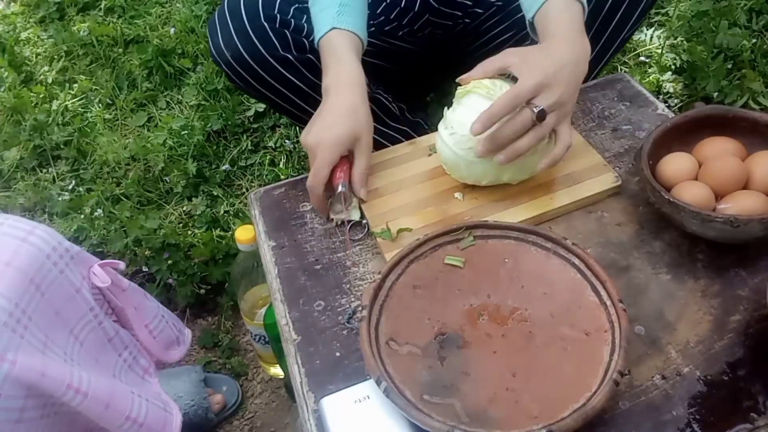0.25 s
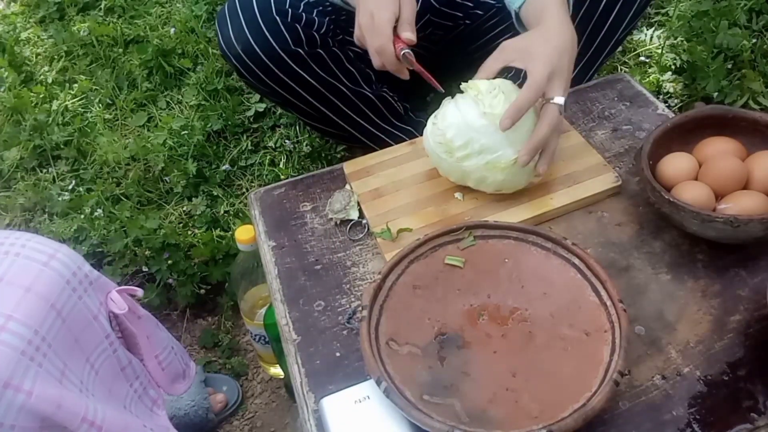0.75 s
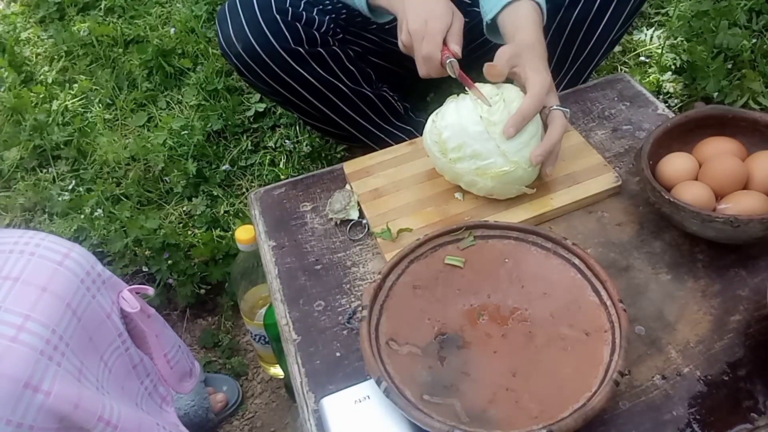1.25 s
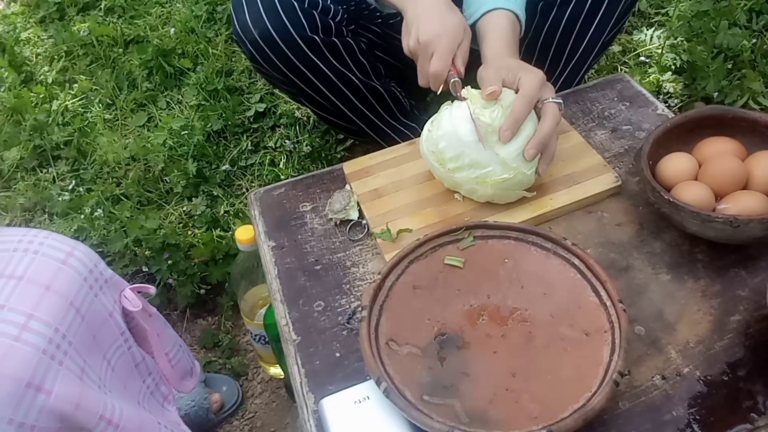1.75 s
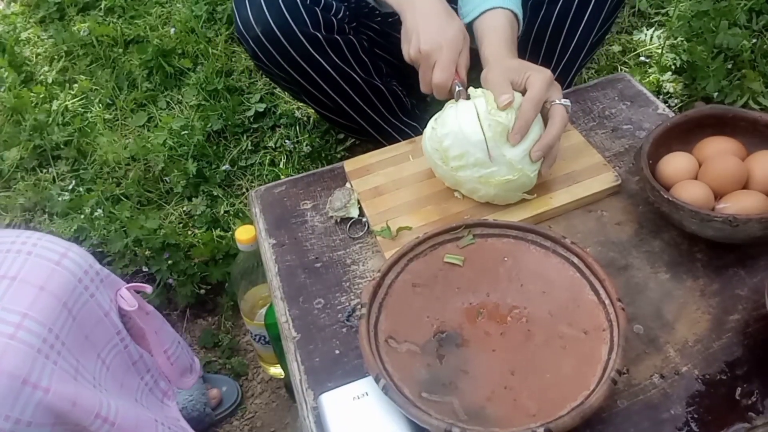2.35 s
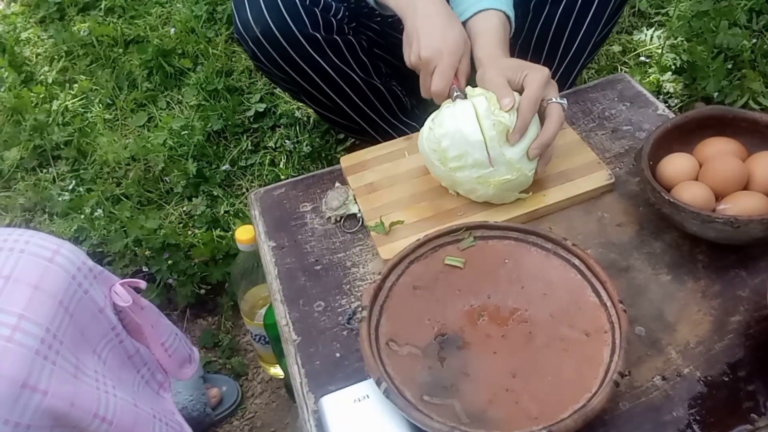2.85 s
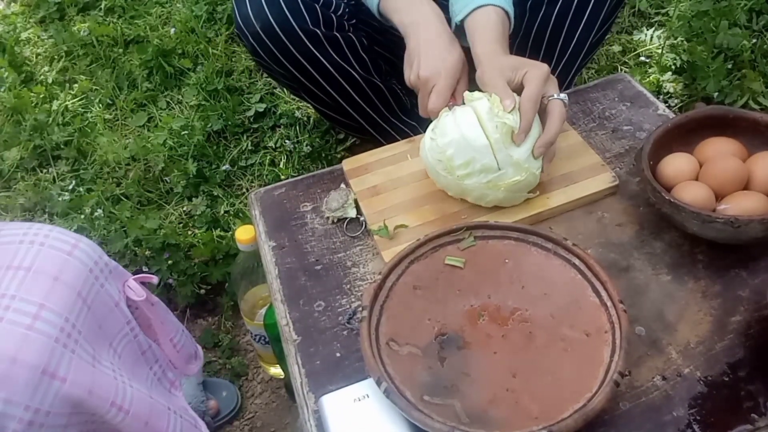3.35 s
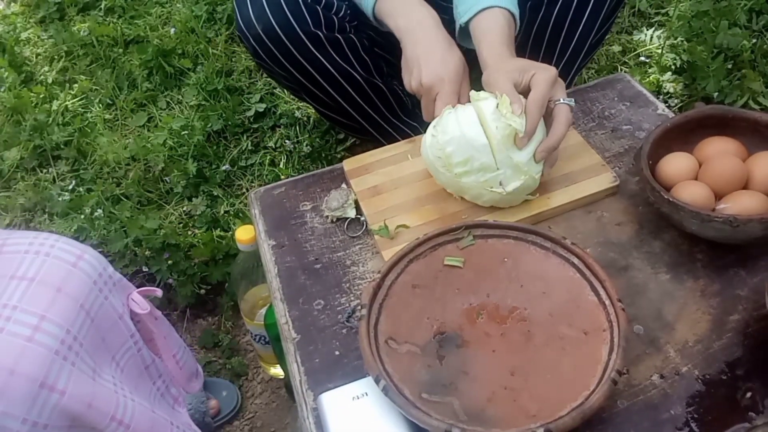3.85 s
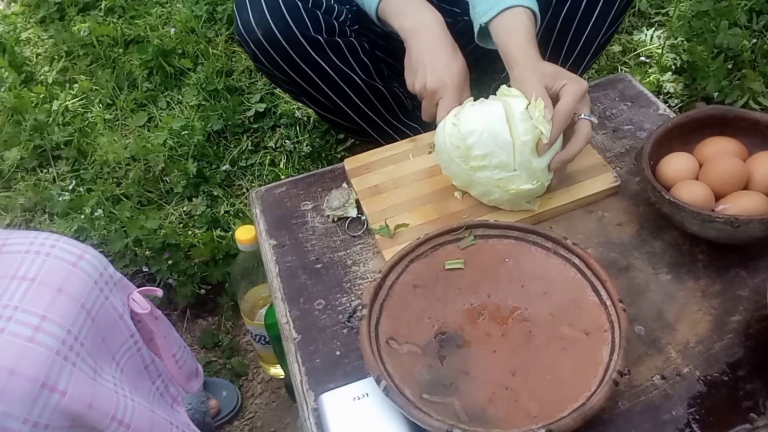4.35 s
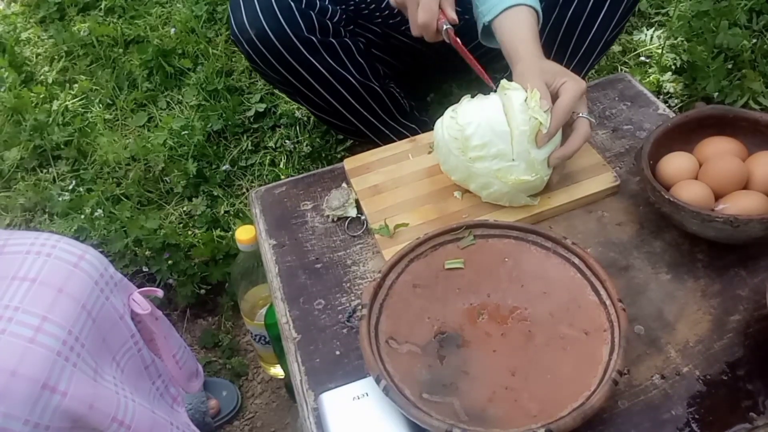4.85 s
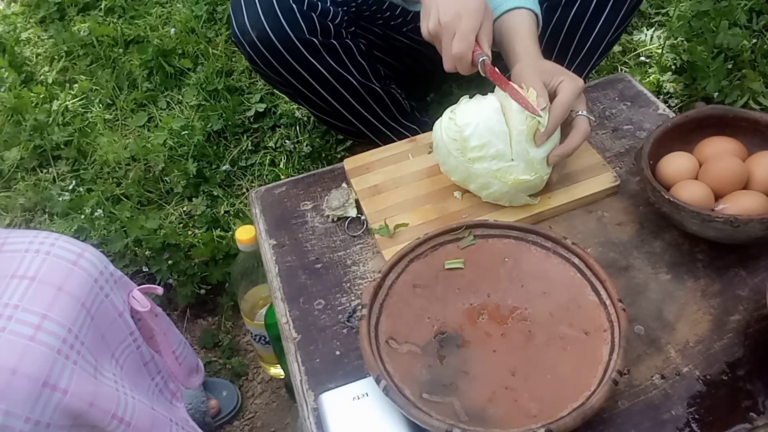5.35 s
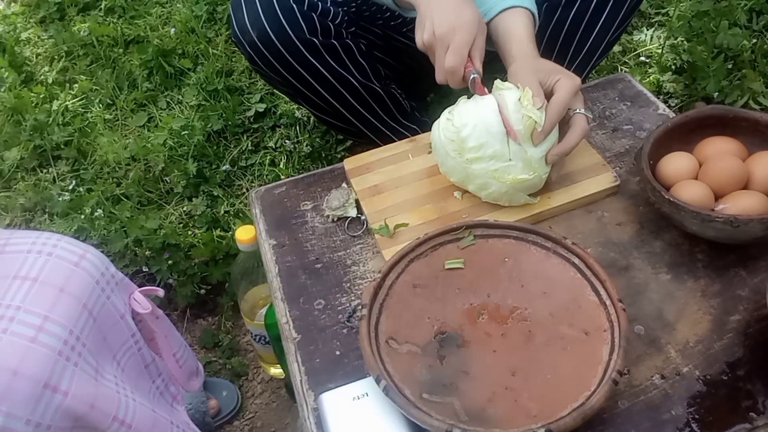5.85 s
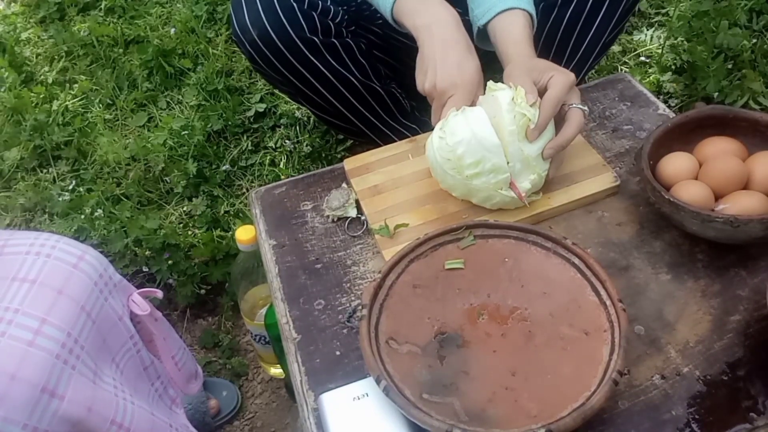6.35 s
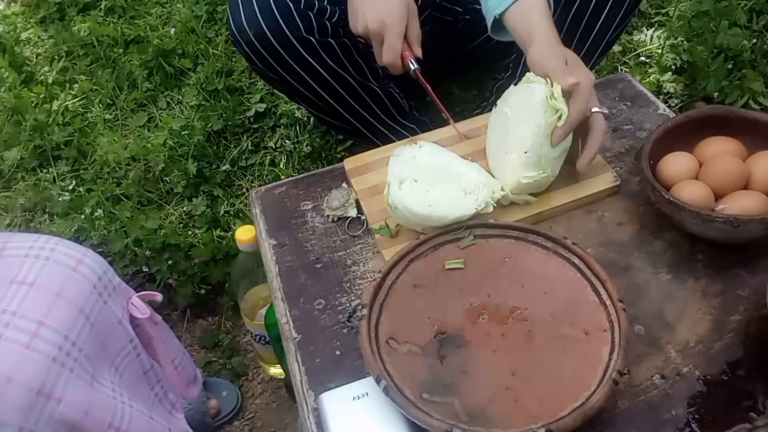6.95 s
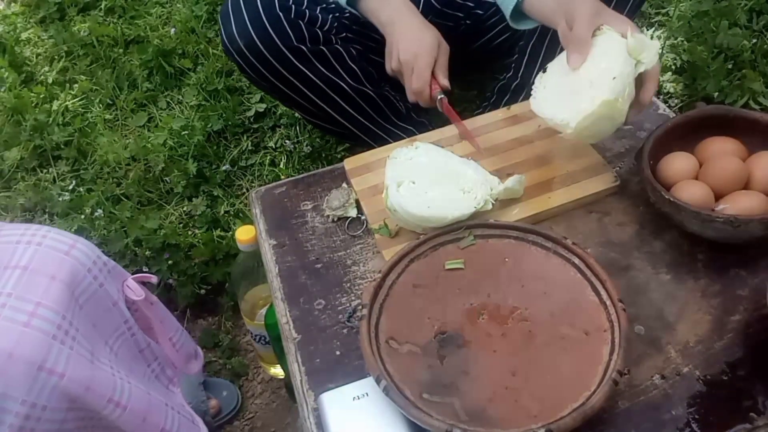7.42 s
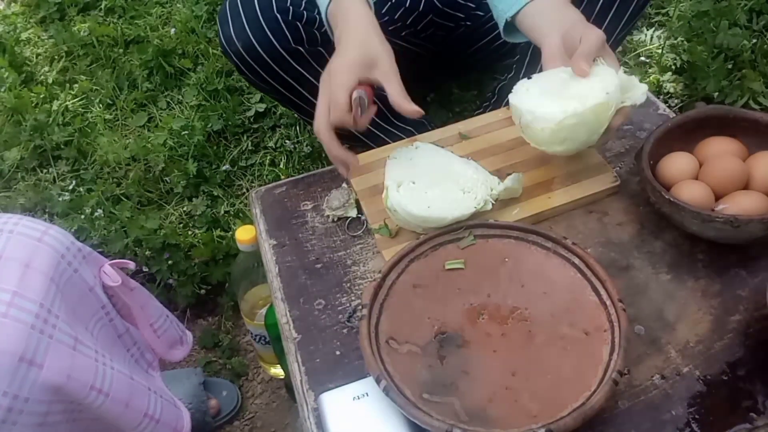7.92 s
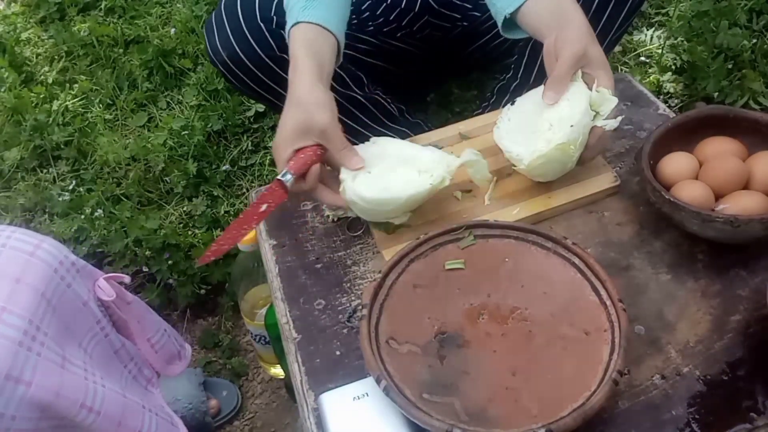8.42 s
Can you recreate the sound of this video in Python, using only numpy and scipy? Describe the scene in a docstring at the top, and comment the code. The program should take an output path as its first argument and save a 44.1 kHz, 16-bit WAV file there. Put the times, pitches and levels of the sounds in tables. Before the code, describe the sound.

Close, dry outdoor cabbage cutting: leafy rustles, a sharp clack, rhythmic crunching saw strokes with cracks, a splitting crack, and hollow wooden knocks.

```python
"""Hands rustle over leaves and a soft low rumble lies underneath; then a knife clacks on a table outdoors.
Close to the microphone it saws through a raw cabbage on a wooden board.
Leaves tear in bursts of tiny random fractures, ribs and core crack, and slips make the wet blade squeak.
Hollow pockets pop with sagging notes; the head splits and its halves knock, ringing the modes of the board."""
import sys
import numpy as np
from scipy import signal
from scipy.fft import rfft, irfft
from scipy.io import wavfile
from scipy.ndimage import uniform_filter1d

SR = 44100
rng = np.random.default_rng(int(sys.argv[2]) if len(sys.argv) > 2 else 0)


def dump_mix(stems):
    """Bounce the given channels to the path in sys.argv[1] as a 16-bit WAV at rate SR."""
    frames = np.atleast_2d(stems).T  # one column per channel
    limited = np.clip(frames, -1, 1)  # hard clip at full scale
    pcm = np.round(limited * 32767).astype(np.int16)
    wavfile.write(sys.argv[1], SR, pcm)


N = 382788

# pushes and pulls of the sawing blade, levels before the trim in strokes(): start t/s, length t/s,
# level/dB, growth level/dB, hollow body at start level/dB, at end level/dB, juicy fizz level/dB
SAW_STROKES = [(1.695, .007, -37, 2, 7, 8, 6), (1.73, 0.13, -44.5, 4, -1, 1, 4.5),
               (1.958, 0.067, -44.5, -18, -13, -3, 6.5), (2.109, 0.09, -47.5, -4, 3.5, -1, 4.5),
               (2.271, 0.053, -50.5, 2, -14, 2, 5), (2.438, 0.087, -45, -4, -3.5, 2.5, 5.5),
               (2.599, .1, -46.5, -1, -21, -4.5, 7), (2.775, 0.078, -47.5, -12, -4.5, 3.5, 6.5),
               (2.943, 0.062, -39.5, 14, -9, 7, 2.5), (3.149, 0.051, -52.5, 0, -10, -7, 9.5),
               (3.3, 0.12, -53, -8, 7, 0, -2), (3.529, 0.13, -44.5, -11.5, 1.5, 7, 2),
               (3.746, .11, -54.5, -0.5, -10, 6.5, 4.5), (3.951, 0.094, -42.5, 0, 3.5, 5.5, 5.5),
               (4.09, 0.022, -48.5, -7, 7, 5, -9), (4.194, 0.072, -43, 6, -1, 4.5, 2),
               (4.307, 0.13, -32.5, 6, 5, -5.5, -4.5), (4.526, 0.072, -39, 0.5, 0, -10, 4),
               (4.688, 0.068, -43.5, 1.5, -4, -8.5, 3), (4.818, 0.15, -51, 2, 0.5, -7.5, -27)]
BITE_S = 0.004  # how fast the edge takes hold


def gain_of(db):
    """Decibels to amplitude gain."""
    return 10 ** (np.asarray(db) / 20)


def evened(x):
    """Scales to rms 1."""
    return x / np.sqrt(np.mean(x ** 2) + 1e-20)


def read(points, hz):
    """Joins (f/Hz, value) points on a log-frequency axis."""
    f, value = np.transpose(points)
    return np.interp(np.log(hz + 1), np.log(f + 1), value)


def add(mix, s, sound):
    """Lays a sound into the mix at time s, cut at the mix's end."""
    part = mix[max(round(s * SR), 0):][:len(sound)]
    part += sound[:len(part)]


def click(*spectra, size=2048):
    """The sharpest causal (minimum-phase) pulse that has the product of these spectra."""
    hz = abs(np.fft.fftfreq(size, 1 / SR))
    log_gain = np.log(gain_of(sum(read(points, hz) for points in spectra)))
    log_spectrum = np.conj(signal.hilbert(log_gain))
    return np.fft.ifft(np.exp(log_spectrum)).real[:size // 2]


def ring(modes, size=16384):
    """Dying cosines, each scaled to a resonance peak of its own level."""
    t = np.arange(size) / SR
    out = np.zeros(size)
    for hz, db, t60 in modes:
        fade = gain_of(-60 * t / t60)
        out += 2 * gain_of(db) * fade / fade.sum() * np.cos(2 * np.pi * hz * t)
    return out


def scatter(x, wet_db, knee, fall, size=16384):
    """Nearby things throw back dense coloured echoes that thin out as a power of time."""
    t = np.arange(size) / SR
    onset = 1 - np.exp(-(t / 0.0025) ** 2)
    taps = rng.standard_normal(size) * onset * (1 + t / knee) ** -fall
    colour = [(150, 7.5), (500, 0.5), (1100, -8.0), (2200, -0.5), (4000, -8.5), (9000, -1), (15000, -3.0)]
    late = signal.fftconvolve(taps, click(colour))[:size]
    echoes = gain_of(wet_db) * late / np.linalg.norm(taps)
    echoes[0] += 1  # direct sound
    return signal.fftconvolve(x, echoes)


def fractures(count, per_s, spread_db):
    """Cell walls bursting at random: many small, a few large."""
    chance, size, sign = rng.random((3, count))
    burst = gain_of(spread_db * np.minimum(-np.log(1 - size), 4))
    return (chance < per_s / SR) * burst * np.sign(sign - .5)


def leaf(body_db, fizz_db):
    """One fracture: deep in the head it is hollow, at the surface it fizzes."""
    # colour of breaking leaf before the depth is added: f/Hz, level/dB
    crunch_colour = [(60, -37), (170, -5.5), (360, -2), (680, 3.5), (1400, -0.5), (1680, -3.5), (2050, -2),
                     (3200, -4.5), (4500, -14), (6000, -23.5), (8600, -31), (10500, -46.5), (15500, -51.5)]
    depth = [(600, body_db), (1500, 0), (3200, 0.0048), (8000, fizz_db), (14000, 2.3 * fizz_db)]
    return click(crunch_colour, depth) / np.linalg.norm(click(crunch_colour))


def shifting(x, patchy_db, width_hz, hold, size=1024):
    """The colour drifts at random, in patches width_hz wide that last about hold seconds."""
    hop = size // 4
    z = signal.stft(x, SR, nperseg=size, noverlap=size * 3 // 4)[2]
    patches = rng.standard_normal(z.shape)
    spans = [width_hz * size / SR, hold * SR / hop]  # in bins, in frames
    for axis, span in enumerate(spans):
        bell = np.exp(-(np.arange(-40, 41) / (span / 2)) ** 2)
        patches = signal.fftconvolve(patches, np.expand_dims(bell, 1 - axis), "same", axes=axis)
    gains = evened(gain_of(patchy_db * np.clip(evened(patches), -2, 2)))
    return signal.istft(z * gains, SR, nperseg=size, noverlap=size * 3 // 4)[1][:len(x)]


def pocket(x, depth, size=320):
    """Gaps between leaves return three echoes within milliseconds, at delays drawn for each call."""
    delays, signs = rng.random((2, 3))
    taps = np.zeros(size)
    places = (size * (.1 + .9 * delays)).astype(int)
    taps[places] = depth * np.sign(signs - .5)
    taps[0] = 1
    return signal.fftconvolve(x, taps / np.linalg.norm(taps))


def gesture(length, rise, fall):
    """A force that sets in exponentially, holds until length, and dies away exponentially."""
    t = np.arange(int((length + 5 * fall) * SR)) / SR
    return (1 - np.exp(-t / rise)) * np.exp(-np.maximum(t - length, 0) / fall)


def stepping(count, per_s, spread_db):
    """A gain that jumps to a new random value, on average per_s times a second."""
    step = np.cumsum(rng.random(count) < per_s / SR)
    return gain_of(spread_db * np.clip(rng.standard_normal(count), -2, 2))[step]


def air():
    """Outdoor rumble under a faint hiss: noise bands that drift in colour and swell a little together."""
    # relative colour of the outdoor air: f/Hz, level/dB
    air_colour = [(20, -34.5), (35, -22), (60, 0.5), (110, 3), (170, -1), (260, -17.5), (420, -27.5),
                  (800, -50.5), (1500, -32), (3200, -24.5), (6000, -39), (8600, -39.5), (10500, -49),
                  (15500, -52)]
    level_db, split_hz = -59, 199.5  # mean level; crossover from rumble to hiss
    hz = np.fft.rfftfreq(N, 1 / SR)
    spectrum = rfft(rng.standard_normal(N)) * gain_of(read(air_colour, hz))
    low = 1 / (1 + (hz / split_hz) ** 4)
    rumble = shifting(irfft(spectrum * low, N), patchy_db=3.0, width_hz=70, hold=0.11)
    hiss = shifting(irfft(spectrum * (1 - low), N), patchy_db=4.0, width_hz=190, hold=.14)
    t = np.arange(N) / SR
    swell = np.zeros(N)
    for rate in np.geomspace(.4, 9, 12):  # Hz
        swell += np.sin(2 * np.pi * (rate * t + rng.random())) / np.sqrt(rate)
    return evened(rumble + hiss) * gain_of(level_db + .5 * evened(swell))


def contact():
    """Strength of rustle, shuffle and crackle: powers of the dragging blade and moving hands add up."""
    # flat of the blade dragging inside the head, before the trims below:
    # t/s, rustle level/dB, dull shuffle of the head on the board level/dB
    drag_levels = [(1.7, -61, -86), (1.87, -55.5, -59.5), (2.18, -58, -65), (2.54, -56, -65.5),
                   (3.07, -59.5, -69), (3.52, -56, -67), (3.63, -55.5, -60), (3.96, -58, -63),
                   (4.12, -55.5, -55), (4.43, -48.5, -45.5), (4.83, -53, -68), (5.05, -58, -68)]
    rustle_trim_db, shuffle_trim_db, drag_fade_s = 1.5, 2, 0.043
    # hands gripping, turning and lifting the cabbage: start t/s, length t/s,
    # rustle level/dB, shuffle level/dB, crackle of loose leaves level/dB
    hand_moves = [(0.0, .15, -61, -61.5, -69), (0.18, 0.16, -58, -65, -56),
                  (0.464, 0.25, -58.5, -69.5, -76), (0.723, 0.39, -65.5, -78, -74),
                  (1.394, 0.049, -67, -78, -59.5), (1.557, 0.094, -61, -75.5, -69),
                  (5.053, 0.61, -68, -67.5, -85.5), (5.552, 0.092, -59, -61, -60),
                  (5.72, 0.019, -54, -74, -55.5), (5.802, 0.41, -69.5, -74, -74),
                  (6.21, 0.16, -58, -64.5, -63), (6.384, 0.19, -58.5, -57, -56.5),
                  (6.62, 0.25, -58.5, -67, -61), (6.758, 0.24, -54.5, -67.5, -54.5),
                  (6.993, .19, -53.5, -74, -61), (7.205, 0.028, -56, -68, -53.5),
                  (7.26, 0.23, -60.5, -65.5, -61), (7.377, 0.16, -57, -61, -56.5),
                  (7.57, 0.2, -69.5, -72.5, -80.5), (8.317, 0.061, -62, -80, -61.5),
                  (8.453, 0.038, -62, -82, -66), (8.58, .1, -63.5, -84, -75.5)]
    reach_s, release_s = 0.015, 0.027  # a hand movement sets in and dies away
    resting_db = -72.5  # rustle of hands that only hold the head
    turn_db, turn_s = -1.5, 0.0098  # the drag dips, this quickly, while the blade turns round
    t, sliding = np.arange(N) / SR, np.zeros(N)
    for start, length, *_ in SAW_STROKES:
        add(sliding, start, gesture(length, BITE_S, turn_s))
    s, rustle_db, shuffle_db = np.transpose(drag_levels)
    inside = np.exp(-abs(t - np.clip(t, s[0], s[-1])) / drag_fade_s)
    dip_db = turn_db * (1 - np.minimum(sliding, 1))
    rustle = inside * gain_of(rustle_trim_db + np.interp(t, s, rustle_db) + dip_db)
    shuffle = inside * gain_of(shuffle_trim_db + np.interp(t, s, shuffle_db))
    power = np.array([rustle ** 2 + gain_of(resting_db) ** 2, shuffle ** 2, np.zeros(N)])
    for start, length, *levels_db in hand_moves:
        for layer, db in zip(power, levels_db):
            add(layer, start, (gain_of(db) * gesture(length, reach_s, release_s)) ** 2)
    return np.sqrt(power)


def bounced(x):
    """Adds the echo off the board, whose moving delay sweeps notches through the sound."""
    # the echo shifts as the hands move: t/s, delay t/ms
    board_echo = [(0, .56), (1.2, .56), (5.6, .66), (6.8, 1.35), (7.35, .66), (8.68, .62)]
    s, ms = np.transpose(board_echo)
    n = np.arange(N)
    delay = np.interp(n / SR, s, ms) * SR / 1000  # samples
    echo = np.interp(n - delay, n, x)
    return evened(x + 0.3 * echo)


def rubbing():
    """Friction grains under blade and hands, duller ones under the head, all following the contact."""
    # relative colour of rubbed leaf: f/Hz, level/dB
    rustle_colour = [(80, -32), (300, -16.5), (600, -12.5), (900, 1), (1400, 3), (2100, 1.5), (3200, -0.5),
                     (4500, -6), (6000, -18.5), (8600, -29.5), (10500, -37), (15500, -36.5)]
    # relative colour of the head shuffling on the board: f/Hz, level/dB
    shuffle_colour = [(120, -19), (230, -2.5), (320, 2), (480, -2.5), (650, -8), (900, -13), (2000, -48.5)]
    rustle_grains = fractures(N, per_s=3500, spread_db=3.3)
    rustle = evened(signal.fftconvolve(rustle_grains, click(rustle_colour))[:N])
    shuffle_grains = fractures(N, per_s=3500, spread_db=3.3)
    shuffle = evened(signal.fftconvolve(shuffle_grains, click(shuffle_colour))[:N])
    rustle = shifting(rustle, patchy_db=4.2, width_hz=260, hold=.085)
    shuffle = shifting(shuffle, patchy_db=5.5, width_hz=130, hold=.06)
    # skin and leaf catch and let go, making the rustle uneven
    rustle = bounced(rustle * stepping(N, per_s=50, spread_db=2.5))
    # now and then a single fibre catches and ticks
    ticks = signal.fftconvolve(fractures(N, per_s=70, spread_db=2.5), leaf(body_db=-5, fizz_db=3))
    ticks = pocket(evened(ticks[:N]), depth=.5)[:N]
    rustle = .92 * rustle + .35 * ticks
    # loose outer leaves crackle as they bend
    crackle = signal.fftconvolve(fractures(N, per_s=160, spread_db=5.0), leaf(body_db=-5.5, fizz_db=5))
    crackle = pocket(crackle, depth=.5)
    crackle = evened(scatter(crackle, wet_db=-7, knee=0.01, fall=1.7)[:N])
    return gain_of(-1.5) * (contact() * [rustle, shuffle, crackle]).sum(0)


def snaps():
    """A thick rib gives way at once, and a few fibres follow within milliseconds."""
    # ribs snapping, before the trim below: t/s, strength level/dB, hollow body level/dB, juicy fizz level/dB
    rib_snaps = [(0.256, -22, -17.5, -3), (1.439, -32, -1, 11), (1.614, -23.5, -7, 7), (1.7, -12, 6, -1),
                 (1.738, -14, 6.5, 7), (2.01, -11, -27, 8), (2.034, -11.5, -8.5, 10.5),
                 (2.186, -10, -14, 0), (2.336, -18, -20, 13), (2.597, -15.5, -22, 6), (2.942, -17, -25, 10),
                 (3.061, -17.5, -7, 9.5), (3.38, -18.5, 3, 8), (3.435, -17, -2, -4), (3.53, -10, 0, 6),
                 (3.908, -18.5, -5, 3), (4.016, -13, -4, 4), (4.068, -16, 1, 4), (4.213, -10, -21, -5),
                 (4.397, -5, 5, 2.5), (4.587, -7, 2, 3), (4.664, -15.5, 1.5, 3), (4.781, -13, -13, 5),
                 (5.036, -19.5, -9, 1), (5.555, -20, -16, 4), (5.746, -18.5, -17.5, 15),
                 (6.319, -11.5, -3, 0.5), (6.396, -20, -8, 7.5), (6.489, -19.5, 9, -1),
                 (6.571, -23.5, -1, -1.5), (6.719, -12, 4, 10), (7.111, -20.5, -7, -16),
                 (7.134, -20, -8, -19), (7.478, -23, 2, 3), (8.336, -28, -8, 9)]
    count, fibres_s = 768, 0.003  # samples; decay of the fibres' breaking
    out = np.zeros(N)
    for s, db, body_db, fizz_db in rib_snaps:
        burst = fractures(count, per_s=4000, spread_db=3) * np.exp(-np.arange(count) / SR / fibres_s)
        burst *= 1.15 / (np.linalg.norm(burst) + 1e-9)
        burst[0] = 1  # the rib itself
        snap = signal.fftconvolve(burst, leaf(body_db, fizz_db))
        add(out, s, gain_of(db - 6.5) * pocket(snap, depth=0.37))
    return out


def spread(blow):
    """Bending waves return from the edges: all-pass loops smear a blow without changing its colour."""
    # round trips to the edges and back: trip t/ms, share thrown back [-]
    edge_returns = [(.4, .4), (1.15, -0.49)]
    hz = np.fft.rfftfreq(2 * len(blow), 1 / SR)
    z = rfft(blow, 2 * len(blow))
    for ms, share in edge_returns:
        trip = np.exp(-2j * np.pi * hz * ms / 1000)
        share = np.clip(share, -.7, .7)
        z = z * (trip + share) / (1 + share * trip)
    return irfft(z)


def knocks():
    """Each blow and its quick rebound ring the board or the blade, and crush a few leaves."""
    # knife clacks, the head rocking, the core cracking and halves knocking, before the trim below: t/s,
    # thump level/dB, body level/dB, knock level/dB, crack level/dB, edge level/dB,
    # rebound t/ms, share of blade ring [0-1], crushed leaves level/dB
    blows = [(0.3193, 22.5, 10.5, 17, 18, 13.5, 1.5, 0.92, -35),
             (0.3728, 2.5, -8, 1.5, 3, -9, 1.28, 1, -63), (0.535, -1, 2, -7.5, -29, -18.5, 3.97, 0, -56),
             (0.555, 2, -9, -21, -21, -36, 3.3, 0, -60), (0.575, 3, -11, -15, -26, -38, 6.3, 0, -56),
             (0.595, 3.5, -10, -16, -20, -37, 3.5, 0, -62),
             (1.0174, 18.5, 15, 15.5, 8.5, -5, 3.4, 0.36, -38),
             (2.989, 5, 17.5, 10, 11, 0.5, 2.19, 0.08, -43),
             (6.7413, 25.5, 18, 24.5, 23.5, 9, 4.47, 0, -29.5),
             (7.6426, 16, 24, 32, 17, 9.5, 4.56, 0.04, -33), (7.8571, 4, 18, 25, 23.5, 3.5, 4.8, 0.18, -33)]
    # where thump, body, knock, crack and edge lie: f/Hz
    blow_hz = [290, 600, 1250, 2400, 4700]
    # board, with table and clay dish ringing along: f/Hz, level over the bare blow/dB, t60 t/s
    board_modes = [(194.3, -0.5, 0.065), (280.3, 0, 0.07), (444, -0.5, 0.049), (660, 1, 0.076),
                   (723, 1.5, 0.047), (867, 5.5, 0.045), (875, -1, 0.47), (1037, -4, 0.066),
                   (1125, -5.5, .15), (1270, 2, 0.054), (1375, 3.5, 0.028), (1654, -5.5, .05),
                   (1760, -4, 0.33), (1870, -2, 0.037), (2075, -2.5, 0.088), (2280, -1, 0.038),
                   (2720, -8, .04), (3030, 1, 0.045), (3630, 3, 0.026), (3850, -4, 0.047), (5550, 5, .03)]
    # knife: f/Hz, level over the bare blow/dB, t60 t/s
    blade_modes = [(536, 8.5, 0.14), (1176, 9.5, .04), (1250, 11, 0.11), (1485, 5.5, 0.05), (1680, -3, .07),
                   (2180, 9, 0.078), (2370, 6, 0.058), (3280, 14.5, 0.032), (3840, -1.5, 0.069),
                   (4180, -16.5, .05), (4240, 3, 0.098), (5000, 10.5, 0.028), (5540, 4, 0.028)]
    out, board, blade = np.zeros(N), ring(board_modes), ring(blade_modes)
    t = np.arange(SR // 4) / SR
    for s, *colour_db, rebound_ms, steel, crush_db in blows:
        thump_db, edge_db = colour_db[0], colour_db[-1]
        spectrum = [(30, thump_db - 47.5), (90, thump_db - 20), (160, thump_db - 5.5),
                    *zip(blow_hz, colour_db),
                    (6300, edge_db - 12.5), (8600, edge_db - 20.0),
                    (11000, edge_db - 33), (15500, edge_db - 40.5)]
        steel = np.clip(steel, 0, 1)
        body = (1 - steel) * board + steel * blade
        body[0] += 1  # the bare blow
        blow = spread(click(spectrum))
        add(blow, abs(rebound_ms) / 1000, -.3 * blow)
        rung = signal.fftconvolve(blow, body)
        add(out, s, gain_of(-4.5) * scatter(rung, wet_db=-8.5, knee=0.012, fall=2.29))
        crush = evened(fractures(len(t), per_s=3600, spread_db=5)) * gain_of(crush_db - 60 * t / .24)
        add(out, s, signal.fftconvolve(crush, leaf(body_db=-6.5, fizz_db=3.5)))
    return out


def pops():
    """Pockets between the leaves open with a short hollow note that sags."""
    # hollow pops inside the head: t/s, starting level/dB, starting f/Hz, t60 t/s
    hollow_pops = [(0.675, -47.5, 320, 0.069), (1.439, -44, 490, 0.052), (3.266, -39.5, 234, 0.13),
                   (4.473, -35, 393, 0.057), (5.034, -32.5, 928, 0.053), (7.405, -44.5, 178, 0.24)]
    sag = 0.059  # share of its pitch that a pop loses over its t60
    out, t = np.zeros(N), np.arange(SR // 4) / SR
    for s, db, hz, t60 in hollow_pops:
        turns = np.cumsum(hz * (1 - sag * np.minimum(t / t60, 1))) / SR
        envelope = gain_of(db - 60 * t / t60) * (1 - np.exp(-t / 0.00045))
        add(out, s, envelope * np.sin(2 * np.pi * turns))
    return out


def strokes(size=16384):
    """The edge tears through tough and tender leaves, its colour gliding between two depths in the head."""
    stop_s = 0.0054  # how fast the tearing dies when the edge stops
    trim_db = -1.78
    out = np.zeros(N)
    for s, length, db, growth_db, first_body_db, last_body_db, fizz_db in SAW_STROKES:
        force = gesture(length, BITE_S, stop_s)[:size]
        count = len(force)
        toughness = stepping(size, per_s=40, spread_db=3)  # steps from leaf to leaf
        grains = (fractures(size, per_s=2400, spread_db=4) * toughness)[:count]
        along = np.minimum(np.arange(count) / SR / length, 1)  # 0 at the start, 1 at the end
        level = gain_of(trim_db + db + growth_db * (along - .5))
        burst = evened(grains * force) * np.sqrt(np.mean(force ** 2)) * level
        tear = signal.fftconvolve(burst * (1 - along), leaf(first_body_db, fizz_db))
        tear += signal.fftconvolve(burst * along, leaf(last_body_db, fizz_db))
        add(out, s, pocket(tear, depth=0.28))
    return shifting(out, patchy_db=2.5, width_hz=450, hold=0.021, size=256)


def squeaks():
    """The wet blade sticks and slips; uneven slips, swelling and then easing, set it singing."""
    # squeaks: t/s, length t/s, level/dB, middle slip rate f/Hz
    blade_squeaks = [(2.338, .037, -39, 450), (2.593, 0.018, -45, 970)]
    out = np.zeros(N)
    slip = click([(60, -39), (450, 20.5), (1000, -3), (2000, -2), (8500, -3.5), (10500, -14)])
    modes = [(2155, 8, 0.022), (2370, 5.0, 0.0096), (3250, 8, 0.021),
             (4900, -13, 0.0067), (8500, -38, 0.0022)]  # f/Hz, level/dB, t60 t/s
    voice = signal.fftconvolve(ring(modes), slip)
    for s, length, db, per_s in blade_squeaks:
        count = int(length * SR)
        wander = evened(uniform_filter1d(rng.standard_normal(count), size=60))
        turns = np.cumsum(per_s * np.exp(.4 * wander)) / SR
        pressure = np.interp(np.linspace(0, 1, count), [0, .7, 1], [.25, 1, .6])
        slips = np.diff(np.floor(turns), prepend=0) * pressure
        sound = signal.fftconvolve(slips, voice)
        add(out, s, gain_of(db) * sound * np.sqrt(count) / (np.linalg.norm(sound) + 1e-9))
    return out


def scene():
    """All sources, close to one microphone, with nearby echoes around the cabbage."""
    cabbage = strokes() + snaps() + squeaks() + pops()
    cabbage = scatter(cabbage, wet_db=-8.5, knee=0.011, fall=1.9)[:N]
    return (cabbage + rubbing() + knocks() + air())[None]


def record(dry):
    """Clips anything beyond full scale, then limits the band to below 15.8 kHz."""
    low_pass = signal.firwin(511, 15800, window=("kaiser", 9), fs=SR)
    return signal.oaconvolve(np.clip(dry, -1, 1), low_pass[None], "same")


dry = scene()
out = record(dry)
dump_mix(out)
```